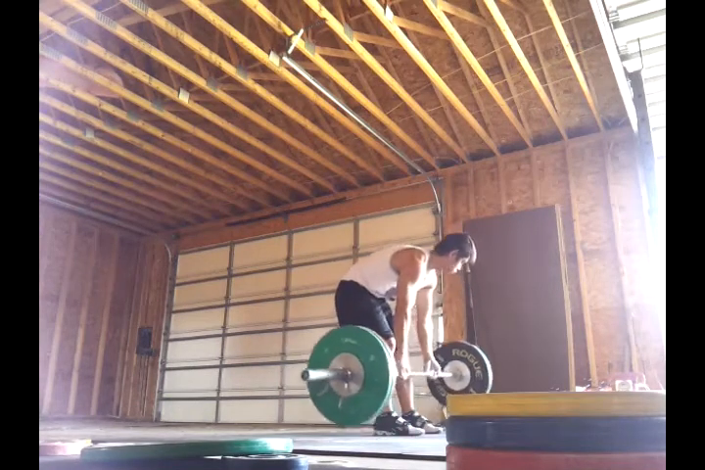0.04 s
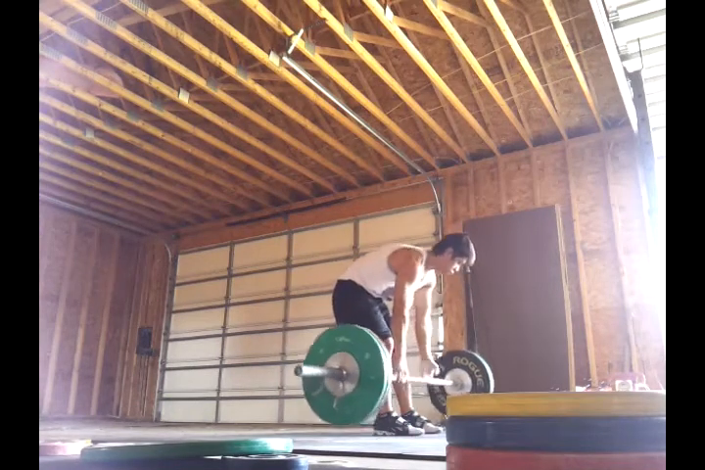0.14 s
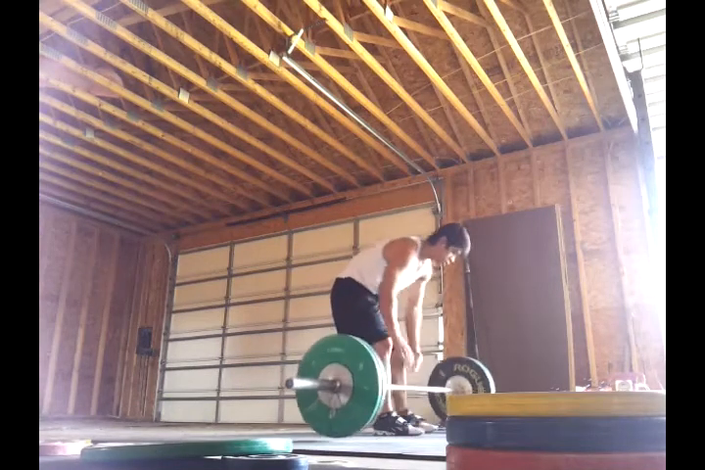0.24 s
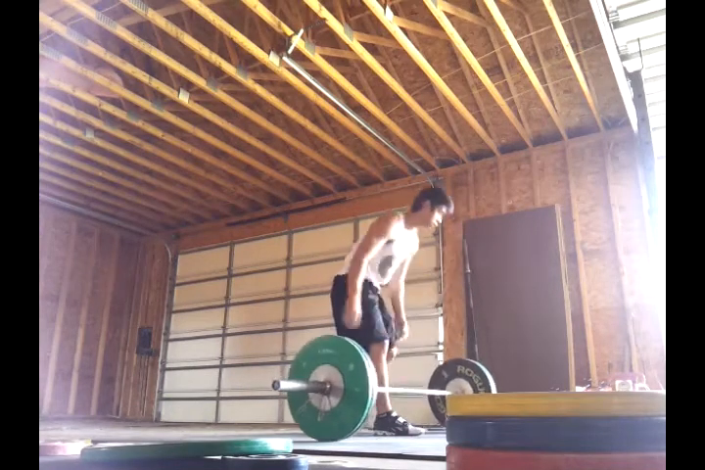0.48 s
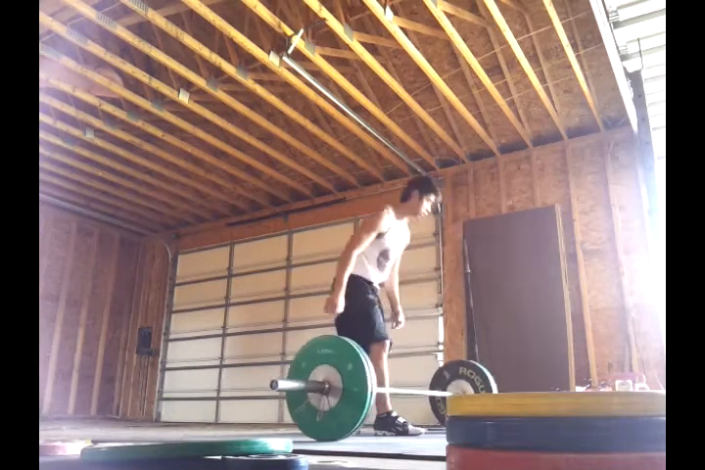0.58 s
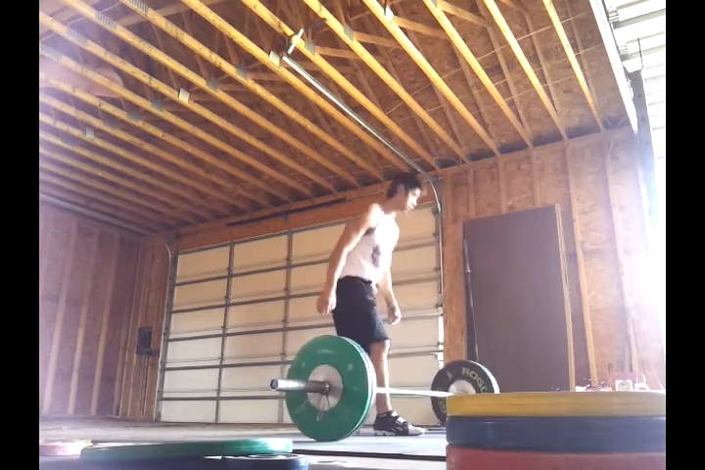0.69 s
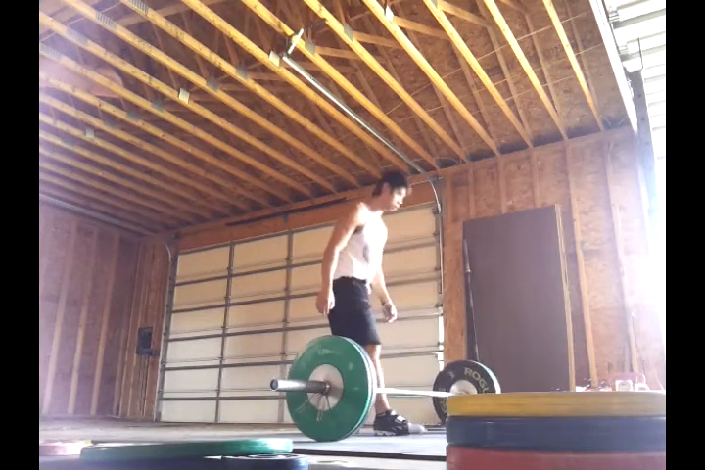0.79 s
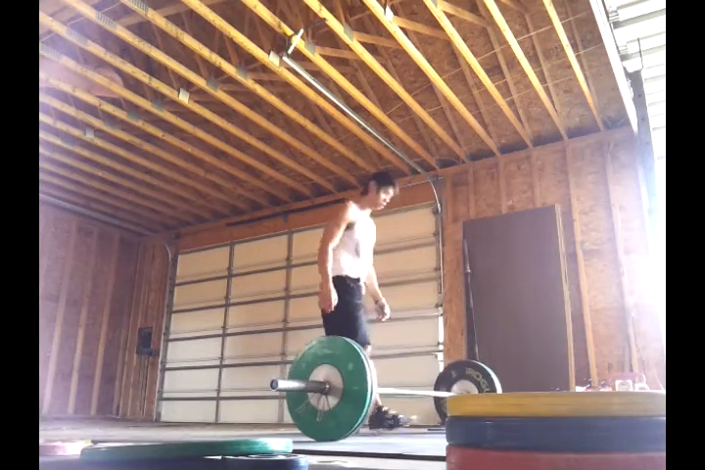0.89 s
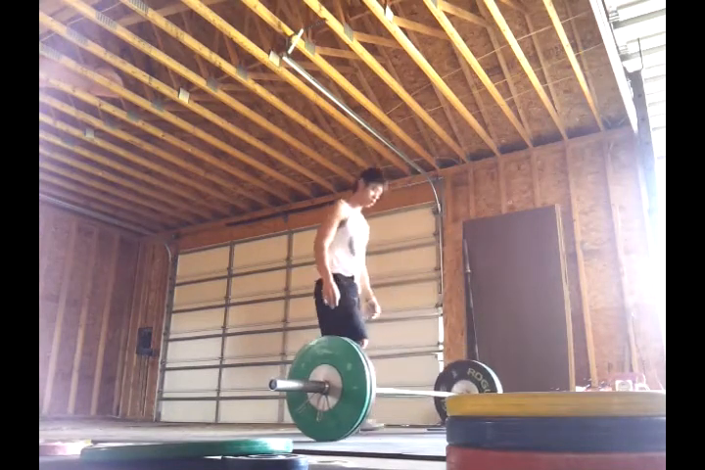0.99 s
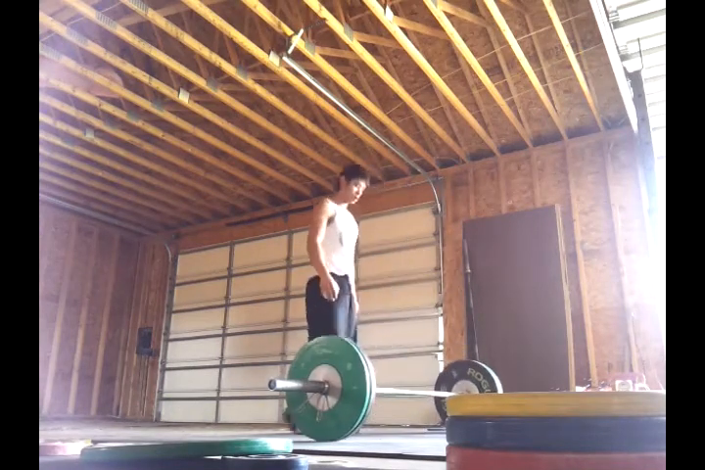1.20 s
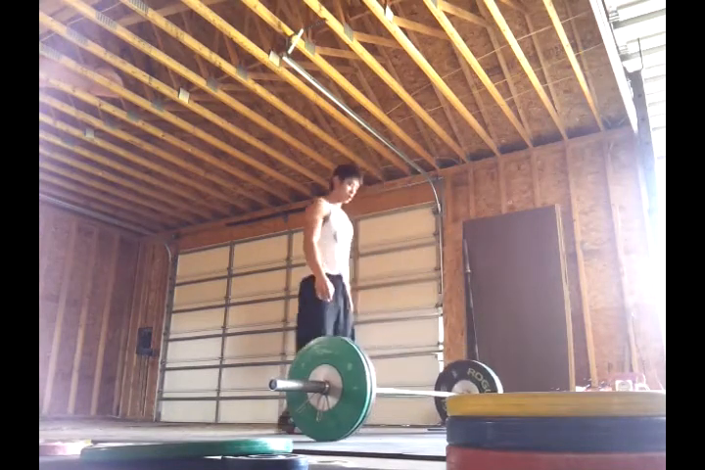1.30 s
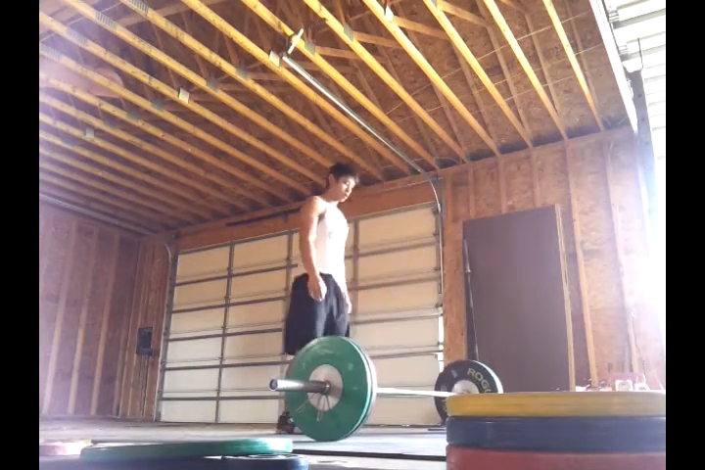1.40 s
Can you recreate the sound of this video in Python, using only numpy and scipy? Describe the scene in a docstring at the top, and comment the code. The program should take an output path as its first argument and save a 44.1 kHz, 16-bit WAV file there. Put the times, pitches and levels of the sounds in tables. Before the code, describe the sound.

A loaded barbell crashes onto a wooden platform with a deep boom, clattering plates and ringing steel. It bounces to rest, then a shoe brushes the floor faintly. The close microphone overloads, and the bare garage reverberates.

```python
"""A bare timber garage, one microphone close to a wooden lifting platform. The lifter stirs faintly.
At 0.23 s a loaded barbell lands: the floor booms, plates knock and clatter on their sleeves, the steel
rings and the room prolongs it. The microphone overloads hard, so the boom chops the clatter.
The bar bounces to rest in ever weaker surges, and at 1.2 s a shoe brushes the floor."""
import sys
import numpy as np
from scipy import signal
from scipy.fft import rfft, irfft
from scipy.io import wavfile

SR = 44100
rng = np.random.default_rng(int(sys.argv[2]) if len(sys.argv) > 2 else 0)


def unload_audio(sound):
    """Save the sound as a 16-bit wav file, at the path given as the first command line argument."""
    columns = np.transpose(np.atleast_2d(sound))
    # keep every value between -1 and 1, then stretch to whole-number steps
    steps = np.round(np.clip(columns, -1, 1) * 32767)
    wavfile.write(sys.argv[1], SR, steps.astype(np.int16))


N = 63945


def undb(db):
    """Decibels to gain."""
    return 10 ** (np.asarray(db) / 20)


def unit(x):
    """Scale to an rms of one."""
    return x / np.sqrt(np.mean(x ** 2))


def since(start):
    """Seconds since a moment, zero before it."""
    return np.maximum(np.arange(N) / SR - start, 0)


def fade(t, t60):
    """Exponential decay, 60 dB down after t60."""
    return np.exp(-np.log(1000) * t / t60)


def curve(points, size=N):
    """Spread (Hz, value) points over the bins of an FFT, along a log-frequency axis."""
    hz = np.arange(size // 2 + 1) * SR / size
    freqs, values = np.array(points, float).T
    return np.interp(np.log(np.maximum(hz, 1)), np.log(freqs), values)


def noise(colour):
    """Steady noise with the given (Hz, dB) colour and an rms of one."""
    return unit(irfft(rfft(rng.standard_normal(N)) * undb(curve(colour)), N))


def response(colour, size=8192):
    """Minimum-phase impulse response with the given (Hz, dB) colour and an energy of one."""
    cepstrum = irfft(np.log(undb(curve(colour, size))))
    cepstrum[1:size // 2] *= 2
    cepstrum[size // 2 + 1:] = 0
    impulse = irfft(np.exp(rfft(cepstrum)))
    return impulse / np.linalg.norm(impulse)


def convolve(x, impulse):
    """Pass a sound through an impulse response."""
    return signal.fftconvolve(x, impulse)[:N]


# surges of the platform, close to the microphone
# (time [s], pitch [Hz], level [dB], hold [s], release t60 [s])
FLOOR_SURGES = [(0.2331, 44.4, 7, 0.059, 0.26), (0.376, 42.7, -1.5, 0.068, 0.15),
                (0.429, 86.5, -5.5, 0.03, 0.36), (0.469, 42, -2, 0.034, 0.44),
                (0.568, 51, -5.5, 0.075, 0.12), (0.71, 52.6, -10.5, 0.081, 0.12),
                (0.908, 53, -19.5, 0.086, 0.22), (1.141, 45, -34, 0.23, 0.54)]
BOOM_ATTACK_S, SQUASH_HZ, SQUASH_S = 0.0133, 98.6, 0.00825
def floor_boom():
    """The platform swings at a low note; harder blows squash the rubber more and start higher."""
    boom = 0
    hardest_db = max(row[2] for row in FLOOR_SURGES)
    for start, hz, db, hold, t60 in FLOOR_SURGES:
        t = since(start)
        extra_hz = SQUASH_HZ * undb(db - hardest_db) ** 2
        cycles = hz * t + extra_hz * SQUASH_S * (1 - np.exp(-t / SQUASH_S))
        envelope = np.minimum(t / BOOM_ATTACK_S, 1) * fade(since(start + hold), t60)
        boom -= undb(db) * envelope * np.sin(2 * np.pi * cycles)
    return boom


# blows that shake the plates on the sleeves (time [s], relative level [dB], t60 [s])
PLATE_BLOWS = [(0.2386, -18, 0.24), (0.2495, -5, 0.51), (0.3, 0, 0.24), (0.433, -8, 0.23),
               (0.478, -12, 0.083), (0.527, -12.5, 0.2), (0.672, -28, 0.38)]
def sleeve_rattle(clicks_per_s=2500, scatter_db=4):
    """Loose plates chatter after each blow: random clicks that drive the clatter and the ring."""
    hits = rng.random(N) < clicks_per_s / SR
    signs = rng.choice([-1, 1], N)
    strengths = undb(scatter_db * rng.standard_normal(N))
    power = sum((undb(db) * (since(0) > start) * fade(since(start), t60)) ** 2
                for start, db, t60 in PLATE_BLOWS)
    return unit(hits * signs * strengths) * np.sqrt(power)


# colour of the plates at close range (frequency [Hz], relative level [dB])
PLATE_COLOUR = [(40, -1.5), (90, 10.5), (130, -8), (220, -7.5), (310, -7), (400, -7.5), (540, 0.5),
                (660, -4.5), (800, -1), (1250, -1.5), (1900, -3.5), (2700, -1), (3200, -0.5), (3650, -7.5),
                (4700, -6), (5200, -4.5), (5600, -4), (6200, -10), (7800, -18.5), (9300, -13.5),
                (12000, -61), (16000, -30)]
def plate_clatter(rattle, gain_db=6):
    """The clicks fill the garage, coloured by the body of the plates."""
    in_room = convolve(rattle, garage())
    return undb(gain_db) * convolve(in_room, response(PLATE_COLOUR))


# modes of the bar and hubs (frequency [Hz], relative level [dB], t60 [s])
STEEL_MODES = [(510, -24, 1.0), (597, -6, 0.5), (860, 17, 0.32), (1088, -14, 0.86), (1461, 15, 0.74),
               (2116, 14, 0.41), (2400, 9, 0.24), (2270, -1, 0.45), (2800, 7, 0.47), (3064, 18.5, 0.22),
               (4380, -10, 0.42), (5000, 3.5, 0.64), (5550, 3, 0.84), (6938, -17, 0.64)]
def steel_ring(rattle, rms_db=-18.5):
    """Every click sets the steel ringing in its decaying modes."""
    t = since(0)
    ring = sum(undb(db) * np.sin(2 * np.pi * hz * t) * fade(t, t60) for hz, db, t60 in STEEL_MODES)
    return undb(rms_db) * unit(convolve(rattle, ring))


# plate faces meeting, heard close and dry (time [s], pitch [Hz], level [dB], t60 [s])
FACE_KNOCKS = [(0.2475, 892, 12, 0.057), (0.268, 574, 6, 0.069), (0.456, 805, 6, 0.08),
               (0.492, 517.7, -5.5, 0.22), (0.545, 553, -7, 0.24)]
def plate_knocks(attack_s=0.0013):
    """Short hollow notes as the plates slap together."""
    knocks = 0
    for start, hz, db, t60 in FACE_KNOCKS:
        t = since(start)
        envelope = (1 - np.exp(-t / attack_s)) * fade(t, t60)
        knocks += undb(db) * envelope * np.sin(2 * np.pi * hz * t)
    return knocks


# reverberation between the bare timber walls (frequency [Hz], t60 [s])
GARAGE_DECAY = [(60, 1.14), (600, 1.228), (1500, 1.02), (3000, 0.9), (5500, 0.73), (9000, 0.68),
                (15000, 0.39)]
def garage(build_s=0.0083, direct_db=-3):
    """Room response: the direct sound, then dense reflections that build up and die sooner in the treble."""
    t = since(0)
    spectrum = rfft(rng.standard_normal(N))
    room = 0
    for band_hz, t60 in GARAGE_DECAY:
        band = curve([(hz, hz == band_hz) for hz, _ in GARAGE_DECAY])
        room += irfft(spectrum * band, N) * fade(t, t60)
    room *= 1 - np.exp(-t / build_s)
    room /= np.linalg.norm(room)
    room[0] += undb(direct_db)
    return room


# rumble of the building around the platform (frequency [Hz], relative level [dB])
TIMBER_COLOUR = [(15, -32), (36, 14), (62, -24), (95, -26), (170, 2), (600, -67)]
def timber_rumble(level_db=-7, t60=0.65):
    """The first blow sets the timber building rumbling between the surges."""
    t = since(FLOOR_SURGES[0][0])
    envelope = np.minimum(t / BOOM_ATTACK_S, 1) * fade(t, t60)
    return undb(level_db) * envelope * noise(TIMBER_COLOUR)


# clothes and shoes by the bar (time [s], level [dB], rise [s], t60 [s])
BRUSH_STROKES = [(0.06, -51, 0.2, 0.86), (1.209, -38.5, 0.047, 0.75)]
# colour of their hiss (frequency [Hz], relative level [dB])
BRUSH_COLOUR = [(500, 5), (3000, -9), (4200, -3), (4900, 1), (6800, 0), (8500, -6.5), (11500, -14),
                (14000, -35)]
def lifter_brushes():
    """Light friction hiss as the lifter moves and steps back."""
    envelope = sum(undb(db) * np.minimum(since(start) / rise, 1) * fade(since(start + rise), t60)
                   for start, db, rise, t60 in BRUSH_STROKES)
    return envelope * noise(BRUSH_COLOUR)


# room tone of the garage (frequency [Hz], relative level [dB])
ROOM_TONE_COLOUR = [(25, -10), (60, 4), (110, -2.5), (170, 6.5), (220, 1.5), (400, 1.5), (800, -3.5),
                    (1600, -5), (2500, -12.5), (3800, -18.5), (6500, -24), (10000, -33), (12000, -44),
                    (15000, -60)]
# its level at the microphone (time [s], level [dB])
ROOM_TONE_LEVEL = [(0, -34.5), (0.2, -29.5), (0.9, -34), (1.2, -34.5), (1.45, -35.5)]
def room_tone():
    """Dull ambient noise, a little louder as the bar comes down."""
    times, levels_db = np.array(ROOM_TONE_LEVEL).T
    return noise(ROOM_TONE_COLOUR) * undb(np.interp(since(0), times, levels_db))


def scene():
    """Everything reaches one close microphone; both channels are the same."""
    floor = floor_boom() + timber_rumble()
    rattle = sleeve_rattle()
    barbell = plate_clatter(rattle) + steel_ring(rattle) + plate_knocks()
    mono = floor + barbell + lifter_brushes() + room_tone()
    return np.array([mono, mono])


# response of the recorder after the overload (frequency [Hz], gain [dB])
RECORDER_RESPONSE = [(11500, -1.5), (12300, -12), (16000, -12.5)]
CLIP_LEVEL, CLIP_SLOPE_DB, TOP_HZ = 0.7, -36, 16000
def record(dry):
    """This close, the mono input clips almost flat; then the recorder dulls and cuts the top."""
    oversampled = signal.resample_poly(dry[0], 2, 1)
    flat = np.clip(oversampled, -CLIP_LEVEL, CLIP_LEVEL)
    leak = undb(CLIP_SLOPE_DB) * (oversampled - flat)  # a little of each peak still gets through
    clipped = signal.resample_poly(flat + leak, 1, 2)
    size = 2 ** 17
    hz = np.arange(size // 2 + 1) * SR / size
    top_cut = 1 / np.sqrt(1 + (hz / TOP_HZ) ** 160)
    gain = undb(curve(RECORDER_RESPONSE, size)) * top_cut
    mono = irfft(rfft(clipped, size) * gain)[:N]
    return np.array([mono, mono])


dry = scene()
out = record(dry)
unload_audio(out)
```